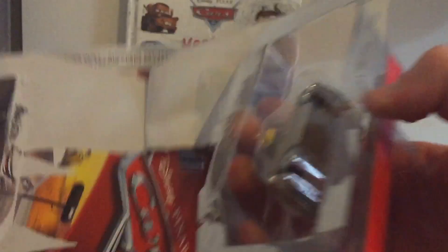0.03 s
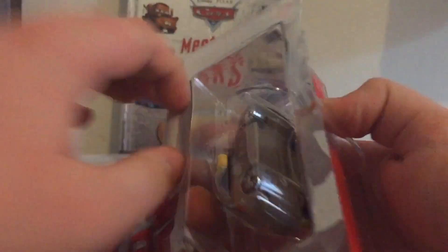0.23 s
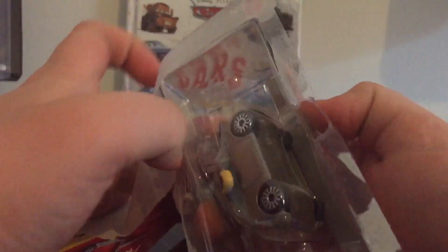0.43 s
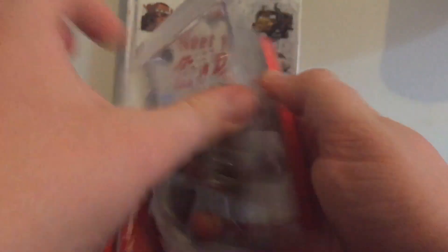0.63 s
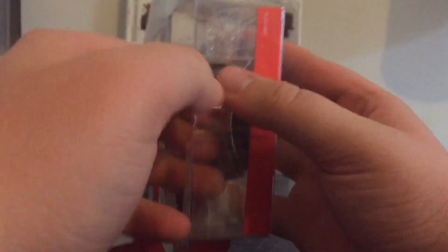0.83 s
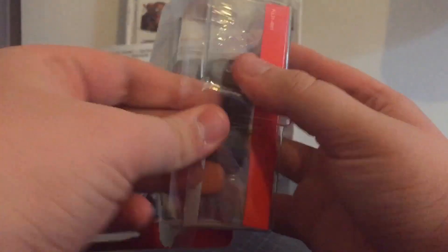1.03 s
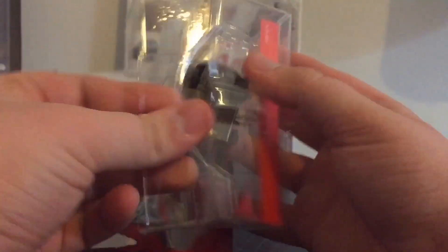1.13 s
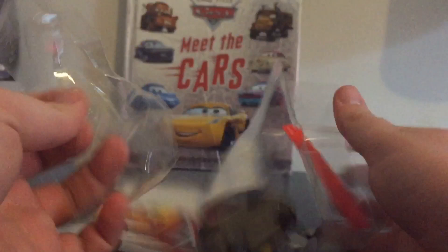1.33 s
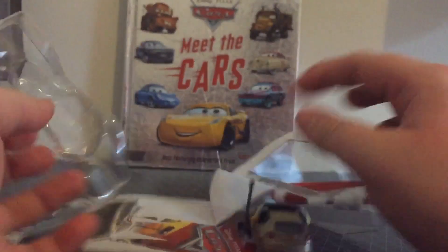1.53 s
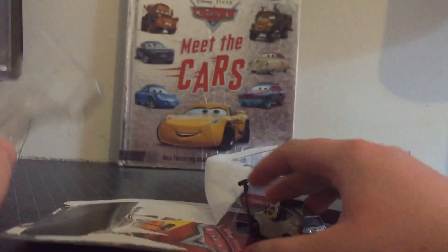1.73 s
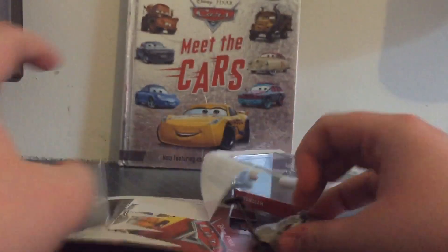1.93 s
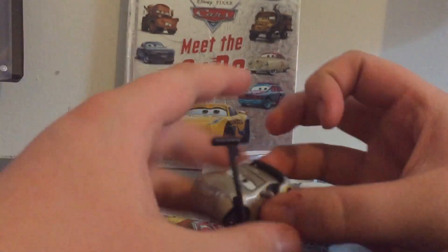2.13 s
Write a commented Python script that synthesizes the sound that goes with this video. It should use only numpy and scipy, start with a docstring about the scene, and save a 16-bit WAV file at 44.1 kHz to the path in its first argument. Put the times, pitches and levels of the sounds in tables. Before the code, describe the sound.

Stiff plastic packaging is pulled open by hand, close to the microphone in a small room. A faint slide and dull bump lead to light ticks around 0.4 s and a sharp double snap at 0.6 s. Softer crackles and crinkles follow until it pops loudly with a low thump at 1.5 s. Hard parts click rapidly at 1.6-1.8 s, then plastic crinkles on the desk around 2 s.

```python
"""A grainy slide and a dull bump come first, then snaps, as hands pull a stiff plastic blister off its card.
The shell buckles in cracks with ringing facets, crinkles as creases flip, and hisses as it slips on skin.
It pops free with a thump; then hard parts click and the empty packaging is pushed about on the desk.
Impacts are decaying filtered noise and sines, friction is random impulses, and hand rumble is low noise.
A small room and the humming desk answer the close sounds; the highest peaks overload the microphone."""
import sys
import numpy as np
from scipy import signal
from scipy.io import wavfile

SR = 44100
rng = np.random.default_rng(int(sys.argv[2]) if len(sys.argv) > 2 else 0)


def materialize(psi):
    """Save the field psi as 16-bit PCM at rate SR to the path in sys.argv[1].

    A 1-D psi becomes a single channel; in a 2-D psi each row is a channel.
    """
    bounded = np.clip(np.atleast_2d(psi).T, -1, 1)
    quanta = np.round(bounded * 32767).astype(np.int16)
    wavfile.write(sys.argv[1], SR, quanta)


N = 96711
T = np.arange(4096) / SR  # time axis of one impact [s]
MS = T * 1000


def amp(db):
    """Decibel law: level to amplitude ratio."""
    return 10 ** (np.asarray(db) / 20)


def unit(x):
    """Root-mean-square normalisation: scales to rms 1."""
    return x / np.sqrt(np.mean(x ** 2) + 1e-20)


def blow(x, size=441):
    """Onset normalisation: scales an impact to rms 1 over its first 10 ms."""
    return x / np.sqrt(np.mean(x[:size] ** 2) + 1e-20)


def level(curve):
    """Amplitude envelope: gain at every sample, interpolated in decibels."""
    return amp(np.interp(np.arange(N) / SR, *np.transpose(curve)))


def add(mix, s, sound):
    """Superposition: adds a sound to the mix in place, starting at s seconds."""
    part = mix[max(round(s * SR), 0):][:len(sound)]
    part += sound[:len(part)]


def colour(x, tone, size=4096):
    """Minimum-phase filtering: the Hilbert transform of the log gain supplies a causal phase."""
    hz, db = np.transpose(tone)
    bins_hz = abs(np.fft.fftfreq(size, 1 / SR)) + 1
    log_gain = np.log(amp(np.interp(np.log(bins_hz), np.log(hz), db)))
    response = np.exp(np.conj(signal.hilbert(log_gain)))
    taps = np.fft.ifft(response).real[:size // 2]
    return signal.fftconvolve(x, taps)[:len(x)]


def burst(decay_ms):
    """High modal density: many crowded modes decay together like exponentially damped noise."""
    return rng.standard_normal(len(T)) * np.exp(-MS / decay_ms)


def rise(ms):
    """Exponential build-up: the soft onset of an impact."""
    return 1 - np.exp(-MS / ms)


def grains(per_s, spread_db):
    """Random impulse process: sparse tiny events of either sign, a few of them large."""
    size = amp(spread_db * np.minimum(rng.exponential(1, N), 4))
    happens = rng.random(N) < per_s / SR
    return size * rng.choice([-1, 1], N) * happens


# Strength of the handling rumble: (time [s], level [dB])
RUMBLE_LEVEL = [(0.4, -44.5), (0.78, -57.5), (0.92, -40.5), (1.1, -65), (1.47, -62), (1.55, -31.5),
                (1.87, -63), (2.18, -70)]
# Spectrum of the rumble: (frequency [Hz], relative level [dB per Hz])
RUMBLE_SPECTRUM = [(35, -28), (63, -1), (130, -1), (260, -5), (10000, -105)]


def rumble():
    """Low-frequency noise: moving hands give random motion weighted to the bass."""
    return level(RUMBLE_LEVEL) * unit(colour(rng.standard_normal(N), RUMBLE_SPECTRUM))


ROOM_DB, ROOM_SPLIT_HZ = -18.5, 4600
ROOM_T60_S, ROOM_TREBLE_T60_S, ROOM_TREBLE_DB = 0.26, 0.15, -8


def room(x):
    """Reverberation: sparse reflections decay exponentially, the treble faster than the bass."""
    t = np.arange(SR // 2) / SR
    arrives = rng.random(len(t)) < 3000 / SR  # reflections per second
    taps = rng.choice([-1, 1], len(t)) * arrives * (t > .004)
    low = signal.sosfilt(signal.butter(2, ROOM_SPLIT_HZ, fs=SR, output="sos"), taps)
    high = signal.sosfilt(signal.butter(2, ROOM_SPLIT_HZ, "high", fs=SR, output="sos"), taps)
    fade = amp(-60 * t / ROOM_T60_S)
    treble_fade = amp(ROOM_TREBLE_DB - 60 * t / ROOM_TREBLE_T60_S)
    tail = low * fade - high * treble_fade  # opposite signs avoid a notch at the split
    return amp(ROOM_DB) * signal.fftconvolve(x, tail / np.linalg.norm(taps * fade))[:N]


# Modes of the desk: (frequency [Hz], initial level [dB], 60 dB decay time [s])
DESK_MODES = [(120, -19.5, 0.67), (311.9, -17, 0.47)]


def desk_hum():
    """Modal resonance: the low modes of the desk ring as damped sines."""
    t = np.arange(SR) / SR
    return sum(amp(db - 60 * t / t60) * np.sin(2 * np.pi * hz * t) for hz, db, t60 in DESK_MODES)


# The hands and the freed toy bump the desk: (time [s], level [dB])
DESK_BUMPS = [(.005, -34), (0.11, -37), (.232, -37.5), (.898, -31), (1.26, -39), (1.483, -16)]
# Spectrum of a bump: (frequency [Hz], relative level [dB per Hz])
BUMP_SPECTRUM = [(15, -28), (100, -5.5), (200, -4.5), (330, 1), (600, -3.5), (8000, -81)]
THUMP_MS = 9.9  # decay time constant


def thumps():
    """Soft impact: a dull push spends its energy at low frequencies and sets the desk humming."""
    out = np.zeros(N)
    for s, db in DESK_BUMPS:
        push = blow(colour(burst(THUMP_MS), BUMP_SPECTRUM))
        add(out, s, amp(db) * push)
        add(out, s, amp(db) * desk_hum())
    return out


# Plastic slides over plastic and skin: (time [s], level [dB])
SLIDE_LEVEL = [(0.06, -35), (0.19, -61), (0.33, -55.5), (0.5, -39.5), (0.58, -46), (0.92, -48.5),
               (1.1, -64.5), (1.15, -46), (1.34, -57.5), (1.47, -35), (1.64, -53.5), (1.74, -34),
               (1.87, -49.5), (2.01, -38.5), (2.14, -60)]
# Spectrum of the sliding, also of the graze before a click: (frequency [Hz], relative level [dB per Hz])
SLIDE_SPECTRUM = [(500, -8.5), (2500, 4), (6000, 4.5), (7500, -1), (8700, 6), (10300, -6.5), (12500, -5.5),
                  (16000, -10)]
SLIPS_PER_S, SLIP_SPREAD_DB = 3500, 1


def slide():
    """Friction noise: dense microscopic slips merge into a grainy hiss."""
    return level(SLIDE_LEVEL) * unit(colour(grains(SLIPS_PER_S, SLIP_SPREAD_DB), SLIDE_SPECTRUM))


# Fine crinkling of shell and card: (time [s], level of the crease rings [dB])
CRINKLE_LEVEL = [(0.0, -45), (0.19, -50.5), (0.255, -45), (0.315, -56.5), (0.5, -38), (0.58, -46.5),
                 (0.66, -47), (0.73, -51.5), (0.89, -30), (1.1, -52), (1.17, -36.5), (1.38, -35.5),
                 (1.48, -19.5), (1.63, -30), (1.8, -34.5), (1.86, -52.5), (1.95, -43.5), (1.98, -27),
                 (2.08, -25), (2.17, -37.5)]
# Spectrum of the crease rings: (frequency [Hz], relative level [dB per Hz])
CRINKLE_SPECTRUM = [(100, -16), (220, -2), (700, 0), (1300, 5), (2400, 0), (3500, -9.5), (16000, -42)]
CREASES_PER_S, CREASE_SPREAD_DB, CREASE_MS = 600, 3.7, 2.8
CREASE_TICK_DB = -17.5  # the bright ticks, relative to the rings


def crinkle(count=12):
    """Crease instability: small facets flip at random, each giving a bright tick and a short ring."""
    flips = [grains(CREASES_PER_S / count, CREASE_SPREAD_DB) for _ in range(count)]
    # every facet keeps one ring of its own
    rings = sum(signal.fftconvolve(train, burst(CREASE_MS))[:N] for train in flips)
    ticks = signal.fftconvolve(sum(flips), burst(CRACK_MS))[:N]
    ring_part = unit(colour(rings, CRINKLE_SPECTRUM))
    tick_part = amp(CREASE_TICK_DB) * unit(colour(ticks, CRACK_SPECTRUM))
    return level(CRINKLE_LEVEL) * (ring_part + tick_part)


# Stiff edges and small hard parts tick together: (time [s], level [dB])
EDGE_CLICKS = [(0.384, -33), (0.9656, -38.5), (1.4765, -34), (1.509, -30), (1.552, -28), (1.6173, -21.5),
               (1.6596, -18.5), (1.6672, -17.5), (1.7164, -17.5), (1.7373, -14.5), (1.757, -28),
               (1.767, -28), (1.7891, -18), (1.813, -25), (1.9088, -25.5)]
# Spectrum of a click: (frequency [Hz], relative level [dB per Hz])
CLICK_SPECTRUM = [(700, -26), (2000, 1.5), (2900, -5.5), (4200, 6), (5700, 2.5), (16000, -25.5)]
CLICK_MS, CLICK_RISE_MS = 1.05, 0.41  # time constants
GRAZE_DB, GRAZE_MS = -8, 3.5  # level relative to the click; lead, rise and decay time


def clicks():
    """Hard contact: edges graze, then a brief contact radiates a dry, broadband knock."""
    out = np.zeros(N)
    for s, db in EDGE_CLICKS:
        knock = blow(colour(burst(CLICK_MS) * rise(CLICK_RISE_MS), CLICK_SPECTRUM))
        add(out, s, amp(db) * knock)
        graze = blow(colour(burst(GRAZE_MS) * rise(GRAZE_MS), SLIDE_SPECTRUM))
        add(out, s - GRAZE_MS / 1000, amp(db + GRAZE_DB) * graze)
    return out


# The shell buckles:
# (time [s], ring level [dB], ring pitch [Hz], ring decay time constant [ms], crack level [dB])
BUCKLINGS = [(0.11, -39.5, 952, 14, -41), (0.1622, -38.5, 1050, 2.4, -41), (.207, -35, 1140, 7.7, -46),
             (0.231, -37, 1980, 7.4, -50), (0.2519, -36.5, 1140, 7.3, -31), (0.294, -40, 1040, 2.6, -59),
             (0.3618, -25.5, 920, 3.3, -35), (0.3628, -29, 2760, 4.3, -41), (0.3747, -27, 2140, 9.8, -42),
             (0.3952, -22.5, 1427, 4.4, -33.5), (.4315, -42, 2570, 10, -39.5), (0.4868, -36, 2355, 23, -30),
             (0.5977, -26, 1137, 7.7, -27.5), (0.6148, -18, 2410, 3.7, -11.5),
             (0.6243, -7.5, 2416, 2.8, -19.5), (0.6261, -12.5, 1510, 3.1, -45),
             (.677, -31.5, 2620, 2.4, -39), (0.71, -38.5, 930, 3.2, -31.5), (0.7453, -17, 6900, 0.64, -29),
             (0.7607, -18.5, 650, 5.8, -23), (0.763, -24, 1230, 11, -24), (0.8517, -34, 2290, 6.7, -31.5),
             (.9, -27, 1440, 12, -26), (.913, -35, 1368, 8.2, -23.5), (1.054, -40.5, 2184, 9.3, -40.5),
             (1.186, -28, 1102, 8.3, -25), (1.2131, -23.5, 3200, 1.6, -19), (1.2446, -26, 993, 1.4, -37),
             (1.26, -21.5, 1033, 2.7, -34), (1.2637, -23.5, 1100, 3.7, -22), (1.3512, -24, 1480, 1.8, -42),
             (1.4049, -25, 1700, 3.4, -33.5), (1.415, -22.5, 1320, 3.7, -30.5),
             (1.4428, -21.5, 2406, 8.2, -28.5), (1.4817, -3.5, 1350, 3.5, -8.5),
             (1.4909, -15.5, 1510, 3.6, -34), (1.524, -12, 1824, 6.6, -36), (1.532, -15.5, 1298, 11.7, -48),
             (1.583, -8.5, 1471, 5.6, -18.5), (1.651, -18.5, 1420, 11.5, -33),
             (1.7726, -22.5, 1696, 2.8, -48), (1.9749, -19.5, 2370, 6.6, -21.5),
             (1.9838, -20, 2460, 9.6, -52), (2.0032, -25.5, 2650, 1.1, -30.5),
             (2.0262, -28, 2400, 3.4, -29.5), (2.0984, -16.5, 2457, 4.6, -63)]
# Distinct modes of a facet: (multiple of the ring pitch [ratio], relative level [dB])
FACET_MODES = [(0.64, -7), (0.998, 13.5), (1.338, 2)]
# Spectrum of a crack before its brightness tilt: (frequency [Hz], relative level [dB per Hz])
CRACK_SPECTRUM = [(200, -14), (1000, 10), (7000, 6), (12000, -4), (16000, -9.5)]
# Spectrum of the whole shell's knock: (frequency [Hz], relative level [dB per Hz])
BODY_SPECTRUM = [(30, -47.5), (150, -7.5), (750, -0.5), (16000, -60)]
CRACK_MS, CRACK_RISE_MS = 0.44, 0.095  # time constants
CRACK_TAIL = 0.16  # amplitude share of the slower noise that follows the crack
# Tilt [dB per octave above the knee, for each dB of strength beyond the neutral level]
CRACK_TILT, CRACK_NEUTRAL_DB, CRACK_KNEE_HZ = 0.31, -38.5, 4950
RING_RISE_CYCLES, RING_OCTAVES = 1, 0.6  # build-up time constant; half-width of the hump
RING_NOISE = 0.47  # power share of crowded modes in the ring
RING_ABOVE_DB_PER_OCTAVE, RING_BELOW_DB_PER_OCTAVE = -4.5, -4  # extra fall on either side of the pitch
BODY_DB, BODY_DB_PER_OCTAVE = -13, -2  # knock relative to a 1 kHz ring; higher facets shake the shell less
BODY_MS, BODY_RISE_MS = 5, 2.2  # time constants


def snaps():
    """Snap-through buckling: a crack, a flipped facet's swelling ring and the shell's hollow knock."""
    out = np.zeros(N)
    octaves = np.linspace(-4, 4, 33)
    hump_db = -20 * np.log10(1 + (octaves / RING_OCTAVES) ** 2)
    hump_db += RING_ABOVE_DB_PER_OCTAVE * np.maximum(octaves, 0)
    hump_db += RING_BELOW_DB_PER_OCTAVE * np.maximum(-octaves, 0)
    for s, ring_db, hz, decay_ms, crack_db in BUCKLINGS:
        envelope = np.exp(-MS / decay_ms) * (1 - np.exp(-T * hz / RING_RISE_CYCLES))
        hump = np.c_[hz * 2 ** octaves, hump_db]
        crowd = blow(colour(rng.standard_normal(len(T)), hump) * envelope)
        sines = sum(amp(db) * np.sin(2 * np.pi * (hz * ratio * T + rng.random()))
                    for ratio, db in FACET_MODES)
        modes = blow(sines * envelope)
        ring = blow(np.sqrt(RING_NOISE) * crowd + np.sqrt(1 - RING_NOISE) * modes)

        body = blow(colour(burst(BODY_MS) * rise(BODY_RISE_MS), BODY_SPECTRUM))
        body_db = BODY_DB + BODY_DB_PER_OCTAVE * np.log2(hz / 1000)

        # stronger cracks are brighter, weaker ones duller
        tilt = CRACK_TILT * (crack_db - CRACK_NEUTRAL_DB)
        tone = [(f, db + tilt * max(np.log2(f / CRACK_KNEE_HZ), 0)) for f, db in CRACK_SPECTRUM]
        fracture = burst(CRACK_MS) + burst(decay_ms) * CRACK_TAIL
        crack = blow(colour(fracture * rise(CRACK_RISE_MS), tone))
        add(out, s, amp(ring_db) * (ring + amp(body_db) * body) + amp(crack_db) * crack)
    return out


DESK_DB = -43  # how strongly every close sound sets the desk humming


def scene():
    """Linear superposition: close handling, the desk and room it excites, and hand rumble."""
    near = thumps() + slide() + crinkle() + clicks() + snaps()
    desk = amp(DESK_DB) * signal.fftconvolve(near, desk_hum())[:N]
    return (rumble() + room(near) + desk + near)[None]


OVERLOAD, EDGE_HZ = 1, 16000  # amplitude ceiling; upper band limit


def record(dry):
    """Saturation and band limiting: the microphone flattens the highest peaks, then loses the top treble."""
    flat = dry / (1 + (dry / OVERLOAD) ** 6) ** (1 / 6)
    lowpass = signal.firwin(401, EDGE_HZ, window=("kaiser", 8), fs=SR)
    return signal.oaconvolve(flat, lowpass[None], "same")


dry = scene()
out = record(dry)
materialize(out)
```